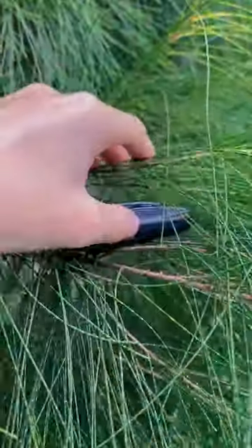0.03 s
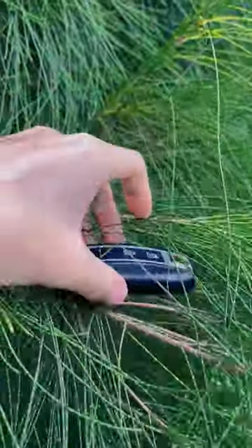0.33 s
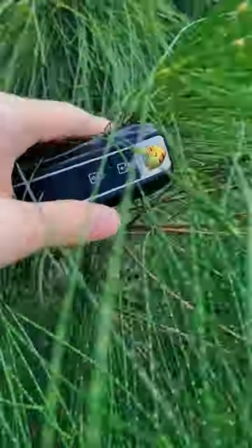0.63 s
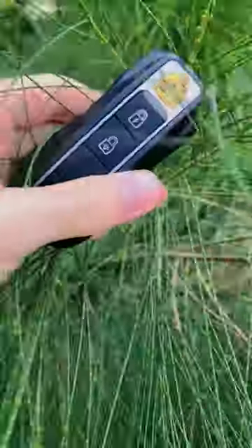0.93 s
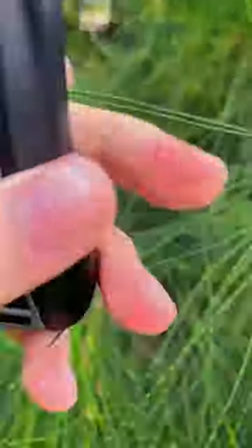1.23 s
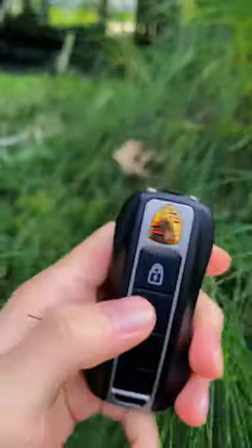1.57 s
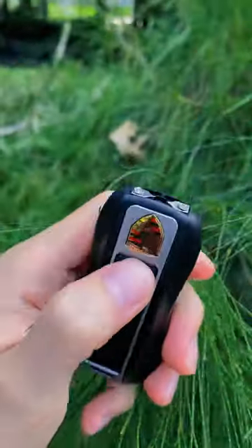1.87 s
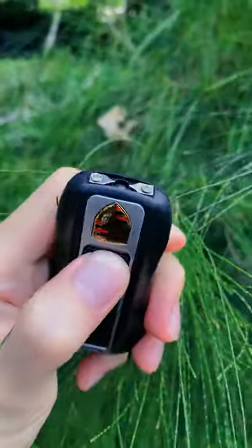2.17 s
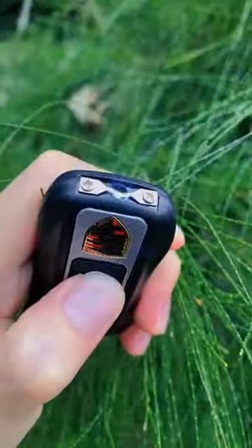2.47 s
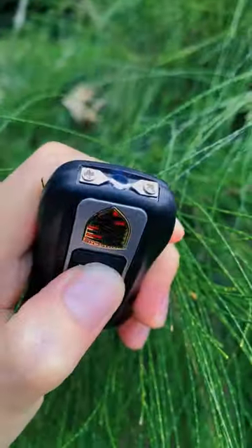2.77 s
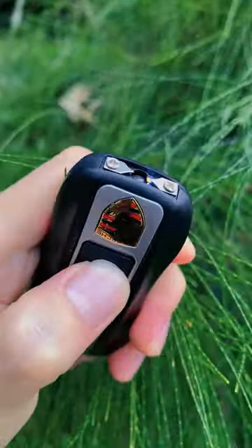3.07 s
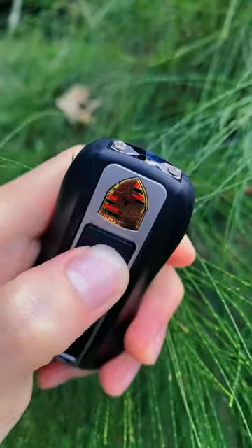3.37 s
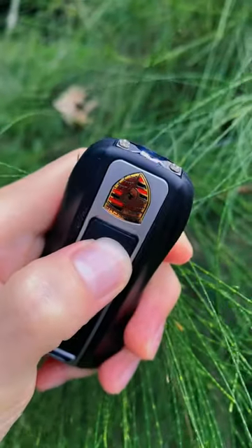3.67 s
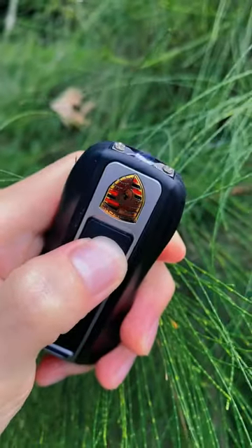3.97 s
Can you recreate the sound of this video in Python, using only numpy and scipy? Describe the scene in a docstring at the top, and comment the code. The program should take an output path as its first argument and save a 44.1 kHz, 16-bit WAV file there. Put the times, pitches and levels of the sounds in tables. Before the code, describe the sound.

A stun device's harsh electric crackle is the main sound. First, grass rustles and ticks softly from about 0.5 to 1.3 seconds over low outdoor rumble. At 2.3 a button clicks and the sparks start with a thump, sizzling continuously, with runs of hard snaps near 2.3, 2.6, 2.8 and 3.5. Wind-like microphone rumble swells underneath, draining around 3.2 and leaving a thin sizzle until 4 seconds.

```python
"""Stun device in long grass

A hand rustles a small stun device out of the grass, over a low rumble of air, and clicks its button.
With a thump, about a hundred sparks a second jump the gap: a harsh sizzle with four runs of hard snaps.
A wind-like microphone rumble swells while they fire; later the low end drains, leaving a thin sizzle."""
import sys
import numpy as np
from scipy import signal
from scipy.fft import rfft, irfft
from scipy.io import wavfile
from scipy.ndimage import uniform_filter1d, map_coordinates

SR = 44100
rng = np.random.default_rng(int(sys.argv[2]) if len(sys.argv) > 2 else 0)


def materialize(psi):
    """Save the field psi as 16-bit PCM at rate SR to the path in sys.argv[1].

    A 1-D psi becomes a single channel; in a 2-D psi each row is a channel.
    """
    bounded = np.clip(np.atleast_2d(psi).T, -1, 1)
    quanta = np.round(bounded * 32767).astype(np.int16)
    wavfile.write(sys.argv[1], SR, quanta)


N = 176400
T = np.arange(N) / SR
FREQS = np.fft.rfftfreq(N, 1 / SR)
ARC_ON_S, TICK_DECAY_S = 2.3265, 0.001
GATE = np.clip((T - ARC_ON_S) / 0.002, 0, 1)  # opens as the sparks start

# Levels in the tables are relative: each layer adds its own trim and EQ.
# firing rate: time_s, sparks_per_s
SPARK_RATE = [(2.33, 89), (2.42, 93), (2.5, 99), (2.6, 95), (2.74, 95), (2.82, 102), (3.05, 105),
              (4.0, 105)]
# hard snaps in four stuttering runs: start_s, level_db, sizzle_duck_db
HARD_SNAPS = [(2.3273, -14, 16), (2.3388, -16, 13), (2.35, -17, 5), (2.3608, -20, 3.5), (2.372, -21, 2.5),
              (2.3933, -22, -0.5), (2.5835, -16.5, 12), (2.5926, -15, 9), (2.6034, -16, 6), (2.614, -15, 5),
              (2.625, -16, 3), (2.6357, -27, 0.5), (2.6461, -24.5, -0.5), (2.81, -17.5, 13),
              (2.8198, -14.5, 13), (2.8292, -17.5, 5), (2.8395, -21, 4), (2.8493, -16.5, 2.5),
              (2.8591, -18.5, 4.5), (2.8687, -27, 0.5), (3.5369, -21, 9), (3.5459, -17.5, 10),
              (3.5552, -21.5, 6), (3.5654, -19, 3), (3.5748, -22, 4), (3.5835, -27, 3), (3.5948, -25.5, 1)]
# faders for the sizzle's treble, mids and lower treble: time_s, level_db
TREBLE_FADER = [(2.36, -26.5), (2.856, -28), (2.916, -29), (3.132, -29), (3.848, -31.5), (4.0, -31.5)]
MID_FADER = [(2.36, -35.5), (2.56, -44.5), (2.72, -37.5), (3.158, -41), (3.168, -36), (3.478, -50.5),
             (3.574, -48), (3.788, -51), (3.866, -43.5), (4.0, -47.5)]
PRESENCE_FADER = [(2.36, 0), (2.9, 0), (3.07, -1.5), (3.3, 1), (3.5, -0.5), (3.81, -3.5), (3.92, -0.5),
                  (4.0, 1.5)]
# faders for the microphone rumble and the arc's buzz: time_s, rumble_db, buzz_db
LOW_FADERS = [(2.35, -27.5, -37), (2.376, -32, -37.5), (2.428, -20.5, -34.5), (2.45, -28.5, -41.5),
              (2.602, -26, -36), (2.644, -40, -42.5), (2.69, -32, -37), (2.722, -26, -38.5),
              (2.882, -40, -40), (2.97, -25.5, -35), (2.992, -30.5, -38), (3.062, -22, -33.5),
              (3.098, -38, -65), (3.122, -31.5, -50), (3.204, -39, -44.5), (3.232, -45, -56.5),
              (3.332, -54, -51), (3.416, -71, -62), (3.54, -73, -59), (3.56, -65, -49), (3.59, -72, -60),
              (3.7, -64, -59), (3.745, -70, -51.5), (3.81, -80, -68), (3.88, -73, -57.5), (4.0, -72, -59.5)]
# treble tone with the device facing us, tipped away, and its bass cut: freq_hz, gain_db
FACING_EQ = [(1290, -8.5), (2200, -7.5), (2690, -0.5), (3220, -4.5), (4490, 1), (5760, -6.5), (6980, -5.5),
             (7900, -4.5), (9410, -11), (10100, -1.5), (11700, 0.5), (12400, -4.5), (13400, -14),
             (15100, -7), (16000, -6)]
TIPPED_EQ = [(1290, -49), (2200, -19), (2430, -3.5), (3530, -3.5), (3870, -1.5), (4460, -1.5), (5620, -7.5),
             (6800, -9), (7710, -6.5), (8730, -8), (9410, -10.5), (11300, -1), (12900, -4.5), (14000, -4.5),
             (16000, -9)]
BASS_CUT_EQ = [(60, -60), (300, -39), (1200, -0.5), (16000, 0)]
# tone of the arc's mids and buzz: freq_hz, gain_db
MID_EQ = [(100, -60), (400, -9.5), (650, -0.5), (950, -2), (1400, -1), (2200, -2.5), (2700, -21.5)]
BUZZ_EQ = [(50, -55), (120, -11), (210, 3.5), (380, 0.5), (600, -8), (900, -44)]
# stereo lean of sizzle and buzz: freq_hz, left_minus_right_db
ARC_PAN = [(60, 1), (87, 2), (130, 2), (180, -7), (260, 4.5), (380, 0), (550, 4.5), (790, 4), (1140, -2.5),
           (1650, -1.5), (2380, 4), (3440, 6), (4970, 0), (7180, 0), (10400, 0), (15000, -0.5)]
# the treble drifts left: time_s, left_minus_right_db
TREBLE_PAN = [(2.4, -1), (3.1, -0.5), (4.0, 2.5)]
# close bounce whose path grows as the hand moves: time_s, delay_ms, gain
BOUNCE = [(2.36, 0.61, .05), (2.9, 0.68, 0.16), (3.25, 0.64, 0.19), (3.6, 0.717, 0.2), (4.0, 0.84, 0.38)]
# gliding peaks in the sizzle: start_s, end_s, start_hz, end_hz, width_hz, level_db
PEAK_GLIDES = [(3.02, 3.66, 13350, 12850, 380, 5), (3.22, 4.2, 14250, 13200, 520, 5),
               (3.05, 4.15, 11750, 10800, 400, -6)]
# thuds under the first three runs of snaps: start_s, level_db
ARC_THUMPS = [(2.3283, -9.5), (2.5933, -19.5), (2.829, -26)]
# ring of the button's click: pitch_hz, level_db, t60_s
CLICK_MODES = [(259, -15, 0.042), (620, 3.5, 0.01), (1330, 2, 0.007), (2090, 2, 0.0045), (3600, -8, 0.0084)]
# grass brushing the hand: time_s, level_db
BRUSH_FADER = [(0.02, -78.5), (0.48, -75), (0.5, -59), (0.55, -64), (0.56, -57), (0.61, -69), (0.64, -67),
               (0.67, -71), (0.86, -60), (0.99, -70), (1.0, -62.5), (1.06, -59.5), (1.07, -53.5),
               (1.09, -56.5), (1.18, -55), (1.4, -79), (1.59, -76.5), (1.76, -86), (1.83, -82.5),
               (2.25, -83.5)]
# tone of that brushing: freq_hz, gain_db
BRUSH_EQ = [(1500, -27), (2700, -8), (4000, -8), (6500, -2.5), (8000, -2.5), (9000, -8.5), (11500, 0.5),
            (13400, -7.5), (15000, -3.5), (16500, -14)]
# stalks flicking free: time_s, level_db, peak_hz, width_octaves
STALK_FLICKS = [(.116, -57, 9000, 1), (0.562, -41, 10500, .6), (0.754, -43.5, 10200, .12),
                (.789, -49, 3800, .8), (0.849, -40, 13000, 0.55), (0.939, -42.5, 5960, 0.64),
                (1.0, -52, 8500, .8), (1.068, -32.5, 4360, 1.2), (1.282, -41, 11400, .15)]
# blades sliding along the case: centre_s, half_length_s, level_db, peak_hz, width_hz
BLADE_SWISHES = [(0.635, 0.016, -56, 6950, 600), (1.168, 0.043, -53, 6100, 1200)]
# tone of the wind-like microphone rumble: freq_hz, gain_db
MIC_RUMBLE_EQ = [(12, -17), (30, 2), (65, 0.5), (140, -4.5), (200, -11.5), (300, -36)]
# tone of the outdoor air: freq_hz, gain_db
AIR_EQ = [(12, -56), (20, -9.5), (49, -3), (185, -5.5), (264, -9), (359, -12), (488, -15), (774, -16),
          (835, -15.5), (1020, -19.5), (2210, -29), (2710, -34), (5000, -45), (9000, -73), (11700, -94),
          (19800, -120)]
# how alike the air is in both ears: freq_hz, correlation
AIR_CORRELATION = [(30, 0.98), (120, 0.78), (300, 0.42), (700, 0.063), (2000, 0.059), (8000, 0.085)]
# the air's fader: time_s, level_db
AIR_FADER = [(0, -43), (2.3, -44.5), (3.1, -42), (3.35, -79), (4, -86)]


def arc(treble_db=2, mid_db=2.5, buzz_db=1, mid_crack_db=-11):
    """The discharge: sizzle and cracks coloured by the device, over a low buzz."""
    cycles = spark_cycles()
    times = spark_times(cycles)
    hiss, cracks = sizzle(times, cycles), snaps(times)
    ducked = hiss * GATE * ducking()
    treble = eq(ducked * amp(curve(TREBLE_FADER) + treble_db) + cracks, BASS_CUT_EQ)
    treble = sway(gliding_peaks(reflection(tip_away(treble))))
    mid_gain = amp(curve(MID_FADER))
    mid_cracks = cracks * amp(mid_crack_db) * (mid_gain / mid_gain.max()) ** 0.58
    mids = eq(ducked * mid_gain * amp(mid_db) + mid_cracks, MID_EQ)
    buzz = eq(narrow(0.69 * hiss + 0.94 * noise(), correlation=0.23), BUZZ_EQ)
    buzz *= GATE * amp(curve(LOW_FADERS, column=2) + buzz_db)
    return irfft(rfft(treble + mids + buzz) * pan(spectrum(ARC_PAN)), N)


def spark_cycles(waver=.012):
    """Running count of sparks: the rate wavers, and a cycle starts on each hard snap."""
    cycles = np.cumsum(curve(SPARK_RATE) * (1 + waver * wander(1500))) / SR
    snap_times = [row[0] for row in HARD_SNAPS]
    offsets = np.unwrap(np.interp(snap_times, T, cycles) % 1, period=1)
    return cycles - np.interp(T, snap_times, offsets)


def spark_times(cycles, ragged_span_s=(2.9, 3.4), jitter_s=(.00005, .0004)):
    """One spark a cycle once the arc strikes, the timing growing ragged."""
    times = T[1:][np.diff(np.floor(cycles)) > 0]
    times = times[times > ARC_ON_S - .004]
    return times + np.interp(times, ragged_span_s, jitter_s) * rng.standard_normal(400)[:len(times)]


def sizzle(times, cycles, smear_s=.014, buzz_share=0.72, flutter=0.051):
    """Every spark smeared over some milliseconds: a rough buzz and hiss, fluttering at the spark rate."""
    pulses = np.zeros((2, N))
    for start_s in times:
        add(pulses, start_s, np.ones(1))
    t = np.arange(2048) / SR
    spectra = rfft(rng.standard_normal((2, 2, len(t))) * np.exp(-t / smear_s))
    smears = irfft(spectra / abs(spectra))
    fades = np.sin(np.pi * T), np.cos(np.pi * T)  # slow morph between two smears
    buzz = sum(signal.oaconvolve(pulses * fade, smear, axes=1)[:, :N]
               for fade, smear in zip(fades, smears))
    buzz /= np.std(buzz[:, T > ARC_ON_S])
    blend = np.sqrt(buzz_share) * buzz + np.sqrt(1 - buzz_share) * noise()
    return blend * (1 + flutter * np.cos(2 * np.pi * cycles))


def snaps(times, rise_s=0.00027, decay_s=0.00035, tail_s=.0012, tail_db=-30, flatness=0.61, trim_db=7):
    """Sharp cracks with a fizzing tail: the hard snaps, plus a faint one on every spark."""
    hits = [row[:2] for row in HARD_SNAPS]
    hits += [(s, -37.5 + np.interp(s, *np.transpose(TREBLE_FADER)) - TREBLE_FADER[0][1]) for s in times]
    t = np.arange(-32, 224) / SR
    envelope = np.exp(np.where(t < 0, t / rise_s, -t / decay_s))
    envelope += (t > 0) * amp(tail_db) * np.exp(-t / tail_s)
    out = np.zeros((2, N))
    for peak_s, level_db in hits:
        burst = rfft(rng.standard_normal((2, len(t))) * envelope)
        crack = unit_rms(irfft(burst / abs(burst) ** flatness)) * np.sqrt(np.mean(envelope ** 2))
        add(out, peak_s + t[0], crack * amp(level_db + trim_db))
    return out


def ducking(attack_s=0.0027, hold_s=0.0091, release_s=.004):
    """The sizzle ducks under each hard snap and recovers just after the next spark."""
    duck_db = np.zeros(N)
    for start_s, _, depth_db in HARD_SNAPS:
        ramp = np.minimum((T - start_s) / attack_s + 1, (start_s + hold_s - T) / release_s + 1)
        duck_db = np.maximum(duck_db, depth_db * np.clip(ramp, 0, 1))
    return amp(-duck_db)


def tip_away(x, span_s=(2.92, 3.41)):
    """The treble changes colour as the device is tipped away."""
    tilt = np.interp(T, span_s, (0, 1))
    return (1 - tilt) * eq(x, FACING_EQ) + tilt * eq(x, TIPPED_EQ)


def reflection(x, above_hz=9000):
    """The top of the sizzle bounces off something close: a comb that slides down."""
    top = irfft(rfft(x) / (1 + (above_hz / (FREQS + 1)) ** 4), N)
    positions = np.arange(N) - curve(BOUNCE) * SR / 1000
    delayed = np.array([map_coordinates(side, [positions], order=5) for side in top])
    return x + curve(BOUNCE, column=2) * delayed


def gliding_peaks(x, fade_s=0.17):
    """Narrow peaks in the top of the sizzle swell and slide down as the device is tipped."""
    out = x.copy()
    for start_s, end_s, start_hz, end_hz, width_hz, level_db in PEAK_GLIDES:
        centre_hz = np.interp(T, (start_s, end_s), (start_hz, end_hz))
        carrier = np.exp(2j * np.pi * np.cumsum(centre_hz) / SR)
        pole = np.exp(-np.pi * width_hz / SR)
        band = 2 * (carrier * signal.lfilter([1 - pole], [1, -pole], x / carrier)).real
        swell = np.clip(np.minimum(T - start_s, end_s - T) / fade_s, 0, 1)
        out += amp(level_db) * swell * band
    return out


def sway(x, below_hz=5238):
    """The lower treble swells and fades while the sizzle drifts left."""
    presence = irfft(rfft(x) / (1 + (FREQS / below_hz) ** 10), N)
    return (x + presence * (amp(curve(PRESENCE_FADER)) - 1)) * pan(curve(TREBLE_PAN))


def thump(level_db, start_hz=518, end_hz=84.5, glide_s=0.00383, decay_s=0.0093):
    """A short falling thud as the arc strikes or catches again."""
    t = np.arange(SR // 10) / SR
    pitch_hz = end_hz + (start_hz - end_hz) * np.exp(-t / glide_s)
    return -amp(level_db) * np.exp(-t / decay_s) * np.sin(2 * np.pi * np.cumsum(pitch_hz) / SR)


def button(trim_db=-21, attack_s=0.00036):
    """The plastic button knocks the case, which rings briefly."""
    t = np.arange(SR // 20) / SR
    ring = sum(amp(trim_db + level_db - 60 * t / t60_s) * np.sin(2 * np.pi * pitch_hz * t)
               for pitch_hz, level_db, t60_s in CLICK_MODES)
    return np.minimum(t / attack_s, 1) * ring


def tick(level_db, peak_hz, width_octaves):
    """A dry tick of thumb or stalk: a tiny noise burst with one peak."""
    t = np.arange(-128, 896) / SR
    octaves = np.log2((np.fft.rfftfreq(len(t), 1 / SR) + 1) / peak_hz)
    band = unit_rms(np.exp(-(octaves / width_octaves) ** 2))
    burst = rng.standard_normal((2, len(t))) * (t >= 0) * np.exp(-abs(t) / TICK_DECAY_S)
    return amp(level_db) * irfft(rfft(burst) * band)[:, t > -TICK_DECAY_S]


def grass(trim_db=2.5, grains_per_s=900, spread_db=3.8):
    """Many tiny rubs of blades on the hand, and a few stalks flicking free."""
    sizes = amp(spread_db * np.minimum(rng.exponential(1, N), 5))
    grains = sizes * (rng.random(N) < grains_per_s / SR)
    rustle = unit_rms(narrow(noise(), correlation=0.09) * (grains + 0.72))
    out = eq(rustle * amp(curve(BRUSH_FADER) + trim_db), BRUSH_EQ)
    for time_s, *flick in STALK_FLICKS:
        add(out, time_s - TICK_DECAY_S, tick(*flick))
    return out


def swish(centre_s, half_length_s, level_db, peak_hz, width_hz):
    """A blade of grass slides along the case."""
    band = np.exp(-((FREQS - peak_hz) / width_hz) ** 2)
    swell = np.exp(-((T - centre_s) / half_length_s) ** 2)
    return unit_rms(irfft(rfft(noise()) * band, N)) * amp(level_db) * swell


def mic_rumble():
    """A low wind-like microphone rumble that swells while the sparks fire."""
    return eq(narrow(noise(), correlation=0.83), MIC_RUMBLE_EQ) * GATE * amp(curve(LOW_FADERS))


def air(waver_db=1.1):
    """A wavering bed of outdoor rumble, nearly mono at the bottom."""
    bed = irfft(narrow(rfft(noise()), spectrum(AIR_CORRELATION)), N)
    return unit_rms(eq(bed, AIR_EQ)) * amp(curve(AIR_FADER) + waver_db * wander(1000))


def amp(db):
    """Decibels to gain."""
    return 10 ** (np.asarray(db) / 20)


def pan(lean_db):
    """Stereo gains for a left-minus-right level."""
    return amp([lean_db / 2, -lean_db / 2])


def unit_rms(x):
    """Scales to rms 1."""
    return x / np.sqrt(np.mean(x ** 2) + 1e-20)


def noise():
    """Stereo white noise."""
    return rng.standard_normal((2, N))


def wander(smooth_samples):
    """Slow random movement at rms 1."""
    return unit_rms(uniform_filter1d(uniform_filter1d(rng.standard_normal(N), 2000), smooth_samples))


def spectrum(rows):
    """A frequency table at every bin, joined up on a log axis."""
    freq_hz, values = np.transpose(rows)
    return np.interp(np.log(FREQS + 1), np.log(freq_hz + 1), values)


def curve(rows, column=1):
    """One column of a time table at every sample."""
    rows = np.array(rows)
    return np.interp(T, rows[:, 0], rows[:, column])


def eq(x, rows):
    """Applies an EQ table, keeping the power of white noise."""
    return irfft(rfft(x) * unit_rms(amp(spectrum(rows))), N)


def narrow(x, correlation):
    """Makes two unrelated channels partly alike."""
    return np.array([x[0], correlation * x[0] + np.sqrt(1 - correlation ** 2) * x[1]])


def add(mix, start_s, sound):
    """Drops a sound into the stereo mix."""
    part = mix[:, max(round(start_s * SR), 0):][:, :sound.shape[-1]]
    part += sound[..., :part.shape[1]]


def scene():
    """Air, grass, the button, the discharge and the microphone rumble."""
    mix = air() + grass() + arc() + mic_rumble() + sum(swish(*row) for row in BLADE_SWISHES)
    add(mix, 2.279 - TICK_DECAY_S, tick(level_db=-47, peak_hz=5200, width_octaves=.5))  # thumb lands
    add(mix, 2.316, button())
    for start_s, level_db in ARC_THUMPS:
        add(mix, start_s, thump(level_db))
    return mix


def record(dry, cutoff_hz=15900):
    """A steep low-pass takes off the very top."""
    lowpass = signal.firwin(511, cutoff_hz, window=("kaiser", 9), fs=SR)
    return signal.oaconvolve(dry, lowpass[None], "same")


dry = scene()
out = record(dry)
materialize(out)
```